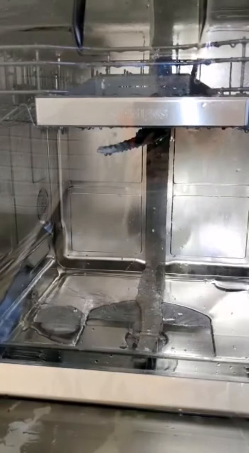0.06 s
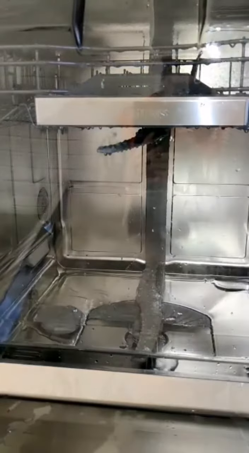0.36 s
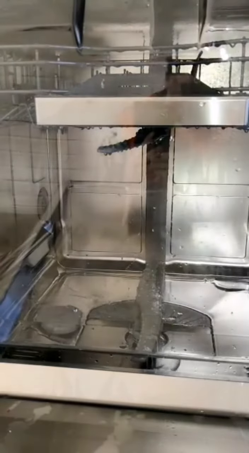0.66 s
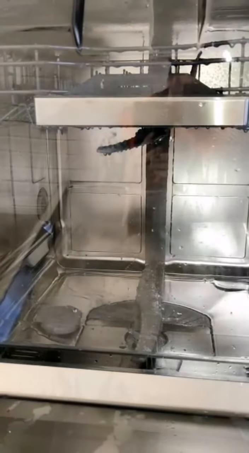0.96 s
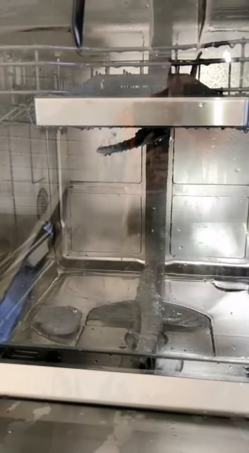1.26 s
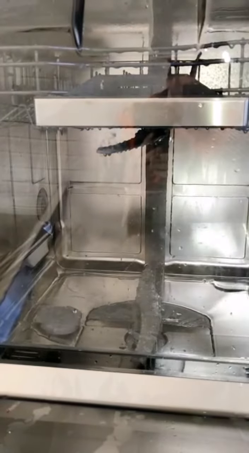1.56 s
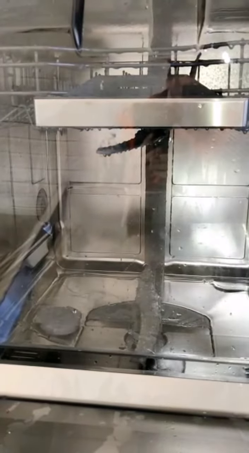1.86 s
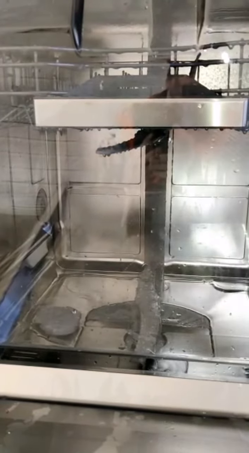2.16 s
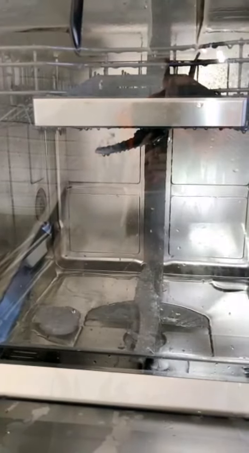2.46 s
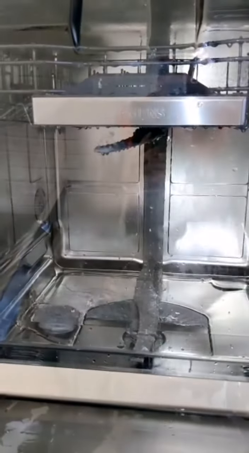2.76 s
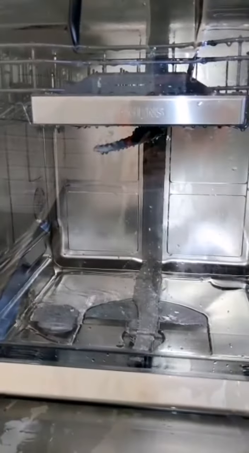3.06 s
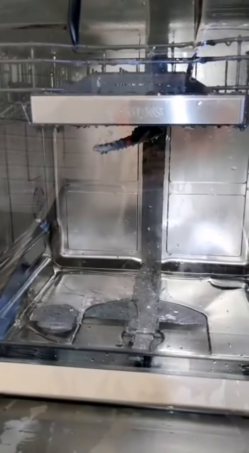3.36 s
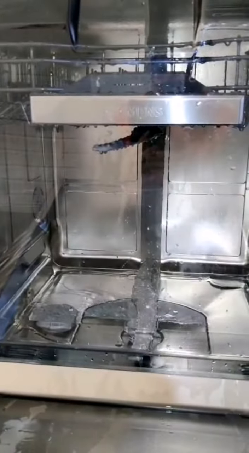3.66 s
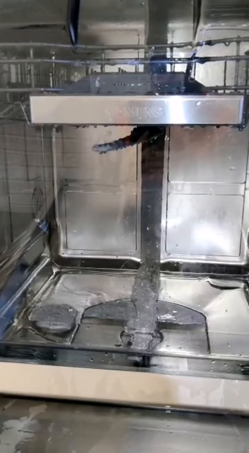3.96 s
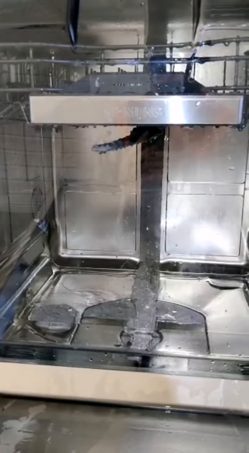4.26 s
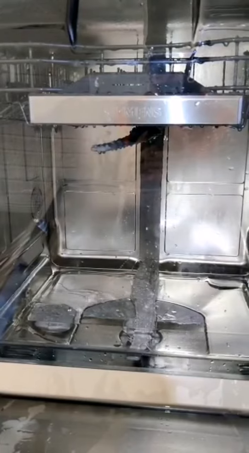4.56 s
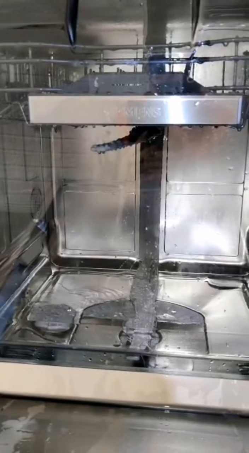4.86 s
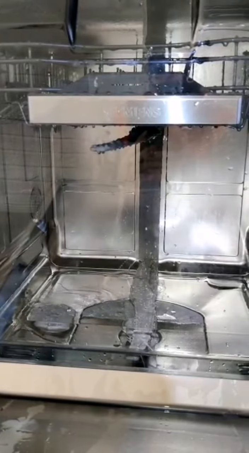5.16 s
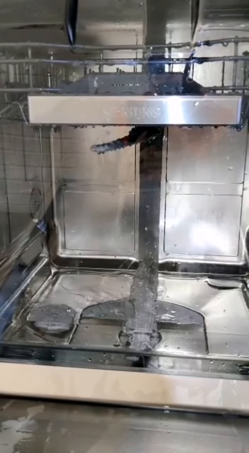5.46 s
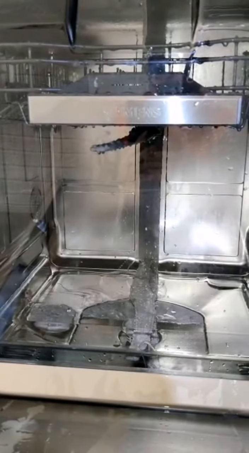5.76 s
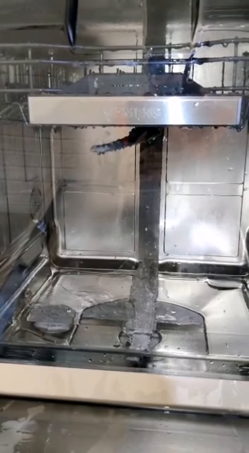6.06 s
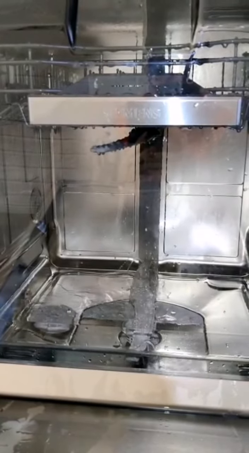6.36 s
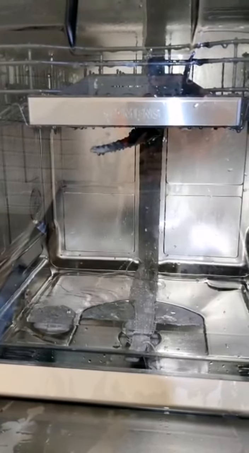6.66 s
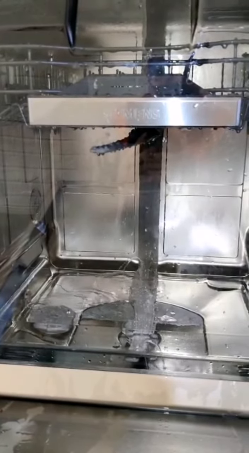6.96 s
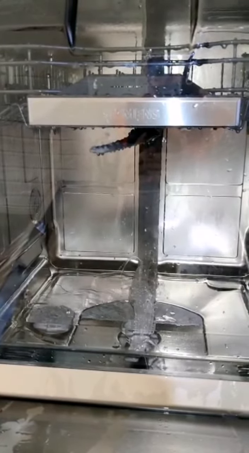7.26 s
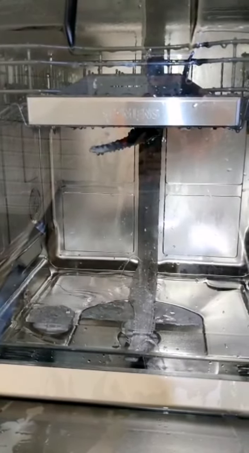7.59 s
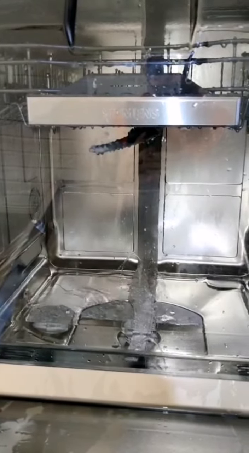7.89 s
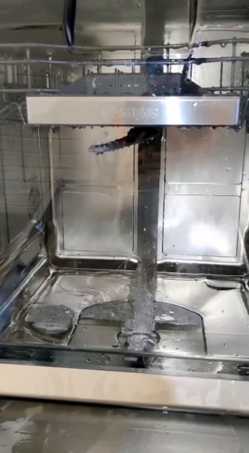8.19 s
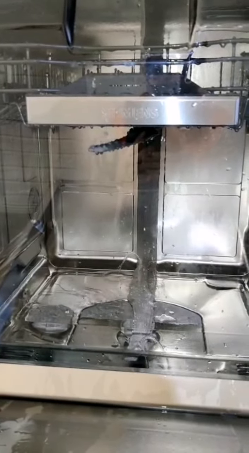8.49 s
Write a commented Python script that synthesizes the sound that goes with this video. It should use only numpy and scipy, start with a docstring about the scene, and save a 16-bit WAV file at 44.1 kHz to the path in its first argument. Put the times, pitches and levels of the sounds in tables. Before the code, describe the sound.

Water sloshes and sprays inside a running dishwasher over the low, even hum of its pump, with a few light splashes and drips.

```python
"""A dishwasher's circulation pump hums close by, a deep shaft tone over the mains buzz.
Water churns in the sump, washes over the walls and patters as fine spray, ringing the steel tub.
A jet of the turning arm hisses past once a turn; now and then a slug of water splashes down or
a drop ticks on steel. Behind it all a second motor whines faintly, sagging as it labours."""
import sys
import numpy as np
from scipy import signal
from scipy.fft import rfft, irfft, next_fast_len
from scipy.io import wavfile
from scipy.ndimage import uniform_filter1d, map_coordinates

SR = 44100
rng = np.random.default_rng(int(sys.argv[2]) if len(sys.argv) > 2 else 0)


def store_pcm(level_fs):
    """Save levels as 16-bit WAV."""
    pcm = np.round(np.clip(level_fs, -1, 1) * 32767).astype(np.int16)
    wavfile.write(sys.argv[1], SR, np.atleast_2d(pcm).T)


N = 384993
T = np.arange(N) / SR
FFT_SIZE = next_fast_len(N + SR // 4)
BIN_HZ = np.fft.rfftfreq(FFT_SIZE, 1 / SR)


def amp(db):
    """Decibels to gain."""
    return 10 ** (np.asarray(db) / 20)


def unit(x):
    """Scale to rms 1."""
    return x / np.sqrt(np.mean(x ** 2) + 1e-20)


def panned(lean_db):
    """Stereo gains for a pan given as left minus right in dB."""
    return amp(np.array([[.5], [-.5]]) * lean_db)


def along(points, hz):
    """Read a curve of (Hz, value) points on a log frequency axis."""
    point_hz, values = np.transpose(points)
    return np.interp(np.log(hz + 1), np.log(point_hz + 1), values)


def curves(rows):
    """One automation curve for each column after the time."""
    times, *columns = np.transpose(rows)
    return [np.interp(T, times, column) for column in columns]


def wobble(rate):
    """A smooth random curve, rate knots a second."""
    knots = rng.standard_normal(int(N * rate / SR) + 4)
    return np.interp(T, T[::32], map_coordinates(knots, [T[::32] * rate]))


def filtered(x, response):
    """Filter x with one gain for each of BIN_HZ."""
    return irfft(rfft(x, FFT_SIZE) * response, FFT_SIZE)[..., :N]


def patter(rate, spread_db):
    """Two trains of drop impacts of random size, rate a second."""
    hits = rng.random((2, N)) < rate / SR
    return unit(hits * rng.standard_normal((2, N)) * amp(spread_db * rng.standard_normal((2, N))))


def patchy(x, depth_db):
    """Narrow bands of the sound swell and fade from moment to moment."""
    bands = signal.stft(x, nperseg=512)[2]
    patches = uniform_filter1d(rng.standard_normal(bands.shape[1:]), size=9, axis=0)
    patches = uniform_filter1d(patches, size=8, axis=1)
    return signal.istft(bands * amp(depth_db * unit(patches)), nperseg=512)[1][:, :N]


# The steel tub's resonances. Each row: centre in Hz, width in Hz, boost in dB.
TUB_MODES = [(166.8, 26.5, 10), (201, 13, 5), (275.4, 19, 4.5), (327, 12, 5.5), (402, 17, 3.5),
             (454, 22, 4), (635, 53, 4), (730, 50, 3), (832, 84, 4.5), (1111, 56, 6.5), (1275, 88, 3),
             (1500, 64, 1), (1986, 85, 4), (2284, 210, 3.5), (3050, 460, 3), (4380, 380, 5.5),
             (4870, 390, 9.5), (6240, 690, 10), (7650, 350, 8)]
# Its stereo width. Each row: frequency in Hz, left-right likeness (1 is mono).
TUB_LIKENESS = [(60, 0.95), (200, 0.97), (400, 0.79), (800, 0.37), (2000, 0.16), (6000, 0.15), (12000, .15)]
# Its stereo balance. Each row: frequency in Hz, left minus right in dB.
TUB_PAN = [(100, -2.5), (150, -4.5), (200, 4.5), (270, -4), (430, 1.5), (700, -1.5), (880, 1), (1130, -2.5),
           (2000, -3), (2300, 1.5), (5000, 1), (12000, .5)]

def through_tub(pair, spectrum):
    """Colour two excitations, ring the tub with them and spread them in stereo at rms 1."""
    hz = np.geomspace(5, SR / 2, num=800)
    on_bins = lambda rows: np.array([np.interp(BIN_HZ, hz, row) for row in rows])
    ring_db = sum(db / (1 + (2 * (hz - centre) / width) ** 2) for centre, width, db in TUB_MODES)
    gain = amp(along(spectrum, hz) + ring_db) / (1 + (hz / spectrum[-1][0]) ** 4)
    spread = np.arccos(np.clip(along(TUB_LIKENESS, hz), -1, 1)) / 2
    mid, side = rfft(pair, FFT_SIZE) * on_bins([gain * np.cos(spread), gain * np.sin(spread)])
    stereo = np.array([mid + side, mid - side]) * on_bins(panned(along(TUB_PAN, hz)))
    return unit(irfft(stereo, FFT_SIZE)[:, :N])


# The whine's partials. Each row: multiple of the shaft speed, level in dB, left minus right in dB.
WHINE_PARTIALS = [(23, -80, 3), (24, -77.5, -6), (25, -75.5, 2), (26, -82, -4)]

def motor_whine(shaft_hz, sag_hz, labour_db, waver_db, blur_rad):
    """A second, slower motor: its partials glide down together and swell each time it labours."""
    sag = sum(np.exp(-((T - at_s) / .9) ** 2) for at_s in (3.52, 8.77))
    phase = 2 * np.pi * np.cumsum(shaft_hz - sag_hz * sag) / SR
    whine = 0
    for order, db, lean_db in WHINE_PARTIALS:
        gain = amp(db + labour_db * sag + waver_db * wobble(2.7)) * panned(lean_db)
        whine += gain * np.sin(order * phase + blur_rad * np.array([wobble(4), wobble(4)]))
    return np.sqrt(2) * whine


# The jet's bright hiss. Each row: frequency in Hz, relative level in dB.
JET_EQ = [(3000, -35), (5000, -13), (6000, -7), (6900, 0), (8000, -13), (9500, -7), (13000, -19)]
# One pass for each turn of the arm. Each row: peak time in seconds, level in dB.
JET_PASSES = [(1.38, -74), (3.77, -65.5), (6.17, -71.5), (8.55, -69.5)]

def arm_jet(half_pass_s, flutter_db):
    """The hiss swells and ebbs each time the arm swings its jet past the near wall."""
    swell = sum(amp(db) / (1 + .5 * ((T - at_s) / half_pass_s) ** 2) ** 2 for at_s, db in JET_PASSES)
    flutter = amp(flutter_db * wobble(30))
    return swell * flutter * through_tub(patter(rate=12000, spread_db=2.5), JET_EQ)


# Drops tick on steel. Each row: start in seconds, level in dB, pitch in Hz, length in seconds.
DROP_TICKS = [(.68, -74, 10000, .015), (1.23, -71, 7500, .015), (1.315, -62, 6000, 0.024),
              (1.665, -64, 6200, 0.017), (2.36, -61, 2950, .02), (2.98, -66, 6360, .035),
              (5.245, -68, 2400, .025)]
# Slugs of water land. Each row: start in seconds, level in dB, pitch in Hz, length in seconds.
SLUG_SPLASHES = [(.53, -57, 520, 0.066), (.84, -52, 1000, 0.032), (.875, -54.5, 760, 0.031),
                 (1.6, -61, 387, .08), (1.98, -57, 750, 0.063), (2.21, -55, 376, 0.054),
                 (7.41, -50, 255, 0.077), (8.095, -55, 720, .045), (8.3, -51, 250, 0.087),
                 (8.618, -51, 660, 0.02)]

def impacts(rows, relative_width):
    """Each lump of water spreads on landing and excites one broad resonance of the wall."""
    track, t = np.zeros((2, N + SR)), T[:SR // 2]
    hz = np.fft.rfftfreq(len(t), 1 / SR)
    for start_s, db, centre_hz, length_s in rows:
        noise = rng.standard_normal(len(t)) + 0.89 * rng.standard_normal((2, len(t)))  # centre + sides
        ring = unit(irfft(rfft(noise) / (1 + ((hz / centre_hz - 1) / relative_width) ** 2), len(t)))
        age = 3 * t / length_s  # the hit peaks a third of the way in
        track[:, round(start_s * SR):][:, :len(t)] += amp(db) * ring * age * np.exp(1 - age)
    return track[:, :N]


# The spray's fizz. Each row: frequency in Hz, relative level in dB.
SPRAY_EQ = [(1500, -22), (2500, -3.5), (3000, 1), (3900, -3.5), (5300, -9.5), (7100, -13), (9000, -22),
            (12000, -14), (14000, -10), (16000, -21)]

def spray(level_db):
    """Fine spray fizzes on the steel as thousands of tiny hits a second."""
    gain = amp(level_db + .25 * wobble(4.02))
    return gain * through_tub(patchy(patter(rate=9000, spread_db=1.5), depth_db=1.34), SPRAY_EQ)


# The wash's midrange body. Each row: frequency in Hz, relative level in dB.
WASH_EQ = [(200, -23), (400, -1.5), (515, -7), (650, -2.5), (930, -3.5), (1200, -3.5), (1420, -3.5),
           (1750, -6), (2100, -9.8), (2600, -15.5), (4000, -35)]

def wash(level_db):
    """Sheets of water drum on the walls in a dense patter."""
    gain = amp(level_db + .25 * wobble(3.4))
    return gain * through_tub(patchy(patter(rate=9000, spread_db=1.2), depth_db=1.1), WASH_EQ)


# The sump's low rumble. Each row: frequency in Hz, relative level in dB.
CHURN_EQ = [(8, -9), (15, 7), (24, 1), (42, -2), (85, -6), (110, -2.5), (142, -8.5), (215, -12), (250, -16),
            (300, -12.5), (365, -22.5), (520, -35), (900, -71)]

def churn(level_db):
    """Water rumbles in the sump, rising and falling as it sloshes."""
    return amp(level_db + .5 * wobble(5)) * through_tub(rng.standard_normal((2, N)), CHURN_EQ)


# The flow over the walls. Each row: time in seconds, level change in dB.
FLOW_RIDE = [(0, -.3), (2.2, 0), (4.1, -0.4), (7.3, 0.5), (8.4, 1.4)]

def water(churn_db, wash_db, spray_db):
    """One flow drives churn, wash and spray; the wash follows it most."""
    flow_db, = curves(FLOW_RIDE)
    surge_db = .2 * wobble(16)  # the jets pulse, moving wash and spray together
    return (churn(churn_db + .55 * flow_db)
            + wash(wash_db + flow_db + surge_db)
            + spray(spray_db + .25 * flow_db + surge_db))


# The hum's partials. Each row: multiple of the shaft speed, level in dB, left minus right in dB.
PUMP_PARTIALS = [(1, -37.5, -1.3), (2, -55, -1.0), (3, -54, -2.5), (4, -65.5, 3), (5, -55, -4),
                 (6, -76, -6), (7, -79.5, 12), (8, -86.5, 4), (10, -80.5, 1.8), (11, -82, -2.2),
                 (12, -84, 4), (15, -72.5, 5.5)]
# Its shifting colour. Each row: time in seconds, boost of partial 3 in dB, boost of 5 and 15 in dB.
COLOUR_RIDE = [(0, 1.5, 3), (1.2, 1, 3), (1.8, -3.5, 0.5), (2.5, 2.5, -1.3), (3.8, -1, 2.5),
               (5.7, -5.5, -1.5), (6.8, 1, -3), (8.3, 3, -4.5)]

def pump(shaft_hz, buzz_hz, buzz_db, throb_db, ease_db_per_s):
    """Shaft partials waver with the water load, over the iron's buzz at twice the mains frequency."""
    third_db, upper_db = curves(COLOUR_RIDE)
    ride_db = {1: -ease_db_per_s * T, 3: third_db + throb_db * wobble(6), 5: upper_db, 15: upper_db}
    phase = 2 * np.pi * shaft_hz * T + .039 * wobble(14)  # the shaft turns a little unsteadily
    hum = amp(buzz_db) * panned(-1.7) * np.sin(2 * np.pi * buzz_hz * T)
    for order, db, lean_db in PUMP_PARTIALS:
        waver_db = (.11 + .13 * order) * wobble(6)  # high partials waver most
        gain = amp(db + ride_db.get(order, 0) + waver_db) * panned(lean_db)
        hum += gain * np.sin(order * phase + 2 * np.pi * rng.random())
    return np.sqrt(2) * hum


def scene():
    """The full mix; hum and water reach the right side a little later than the left."""
    hum = pump(shaft_hz=58.135, buzz_hz=100, buzz_db=-51.5, throb_db=1.2, ease_db_per_s=.11)
    wet = water(churn_db=-45.5, wash_db=-57, spray_db=-64.5)
    wet += arm_jet(half_pass_s=.16, flutter_db=1.5)
    wet += impacts(SLUG_SPLASHES, relative_width=.22)
    wet += impacts(DROP_TICKS, relative_width=.079)
    # the tub's standing waves, in the low mids, arrive nearly in step
    lag_s = .0004 * along([(120, 1), (300, .4), (650, .2), (1000, .9), (3000, 1)], BIN_HZ)
    tub = filtered(hum + wet, np.exp(1j * np.pi * BIN_HZ * lag_s * np.array([[1], [-1]])))
    return tub + motor_whine(shaft_hz=42.82, sag_hz=.52, labour_db=1.5, waver_db=1.6, blur_rad=.3)


def record(dry):
    """Lay a faint hiss under the mix and cut the very top of the treble."""
    hiss = amp(-67) * patchy(rng.standard_normal((2, N)), depth_db=1.35)
    return filtered(dry + hiss, BIN_HZ < 15720)


dry = scene()
out = record(dry)
store_pcm(out)
```